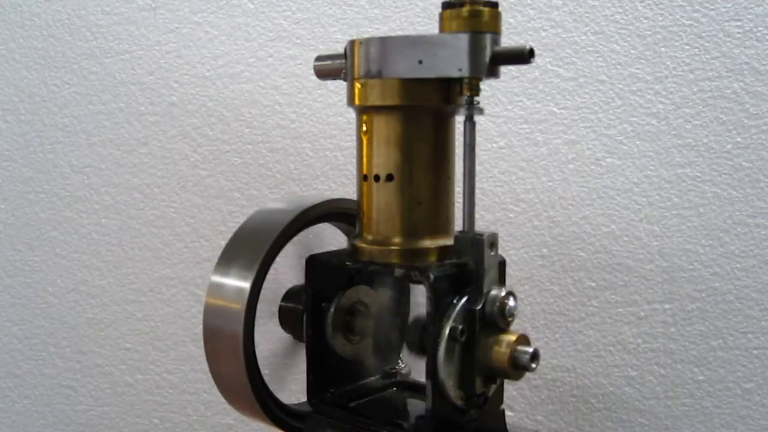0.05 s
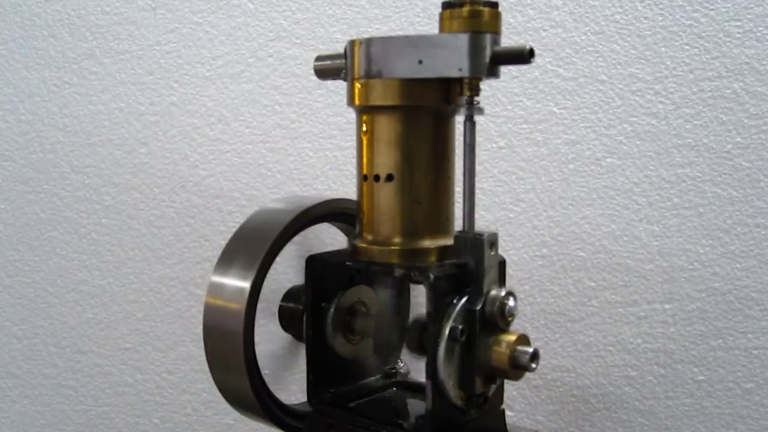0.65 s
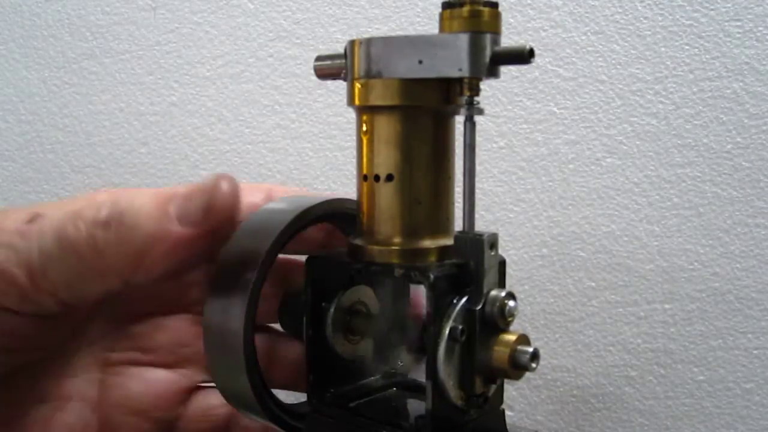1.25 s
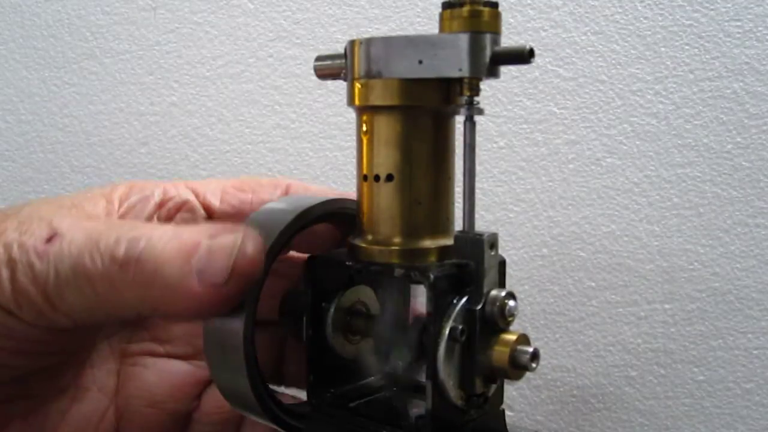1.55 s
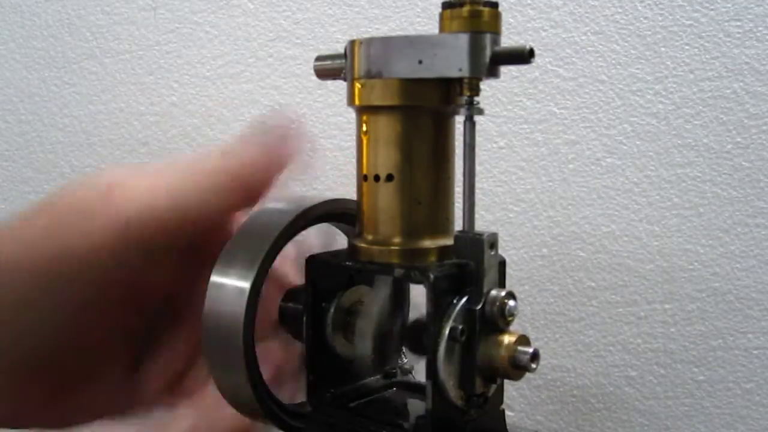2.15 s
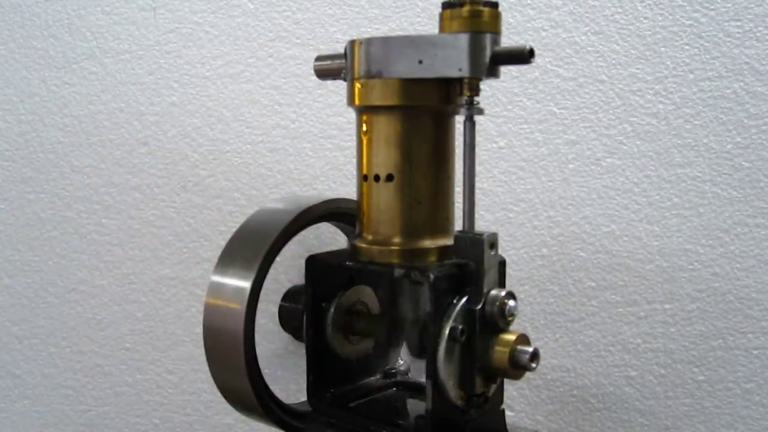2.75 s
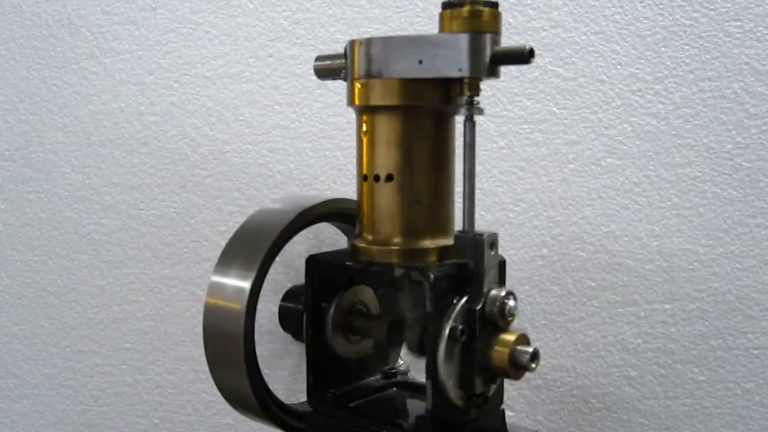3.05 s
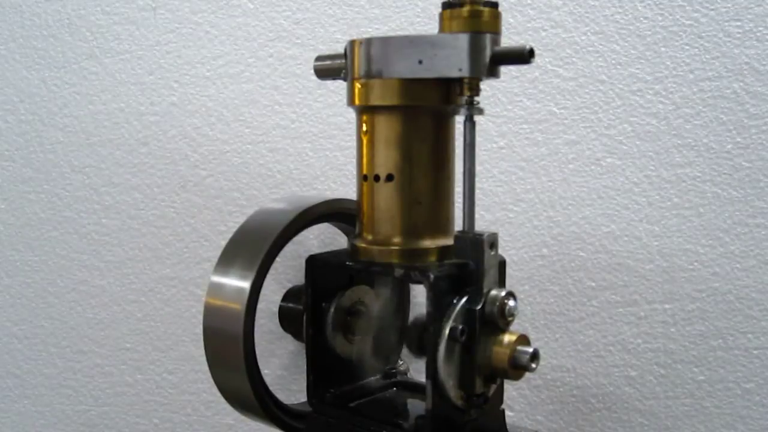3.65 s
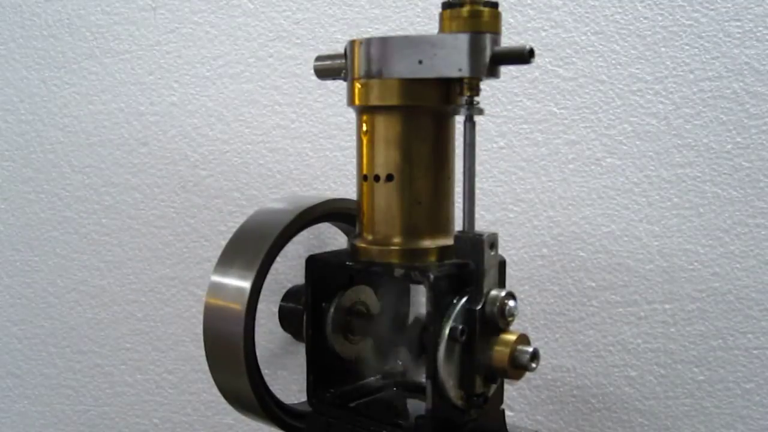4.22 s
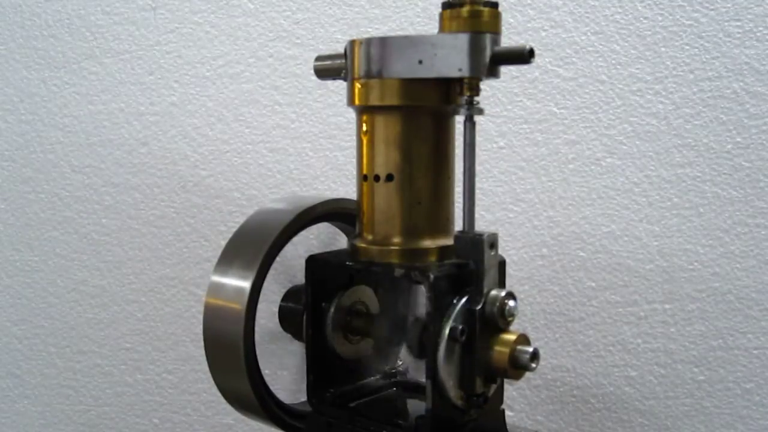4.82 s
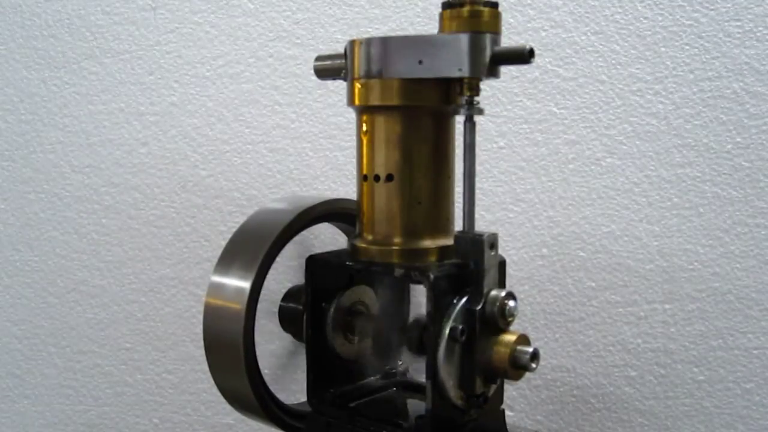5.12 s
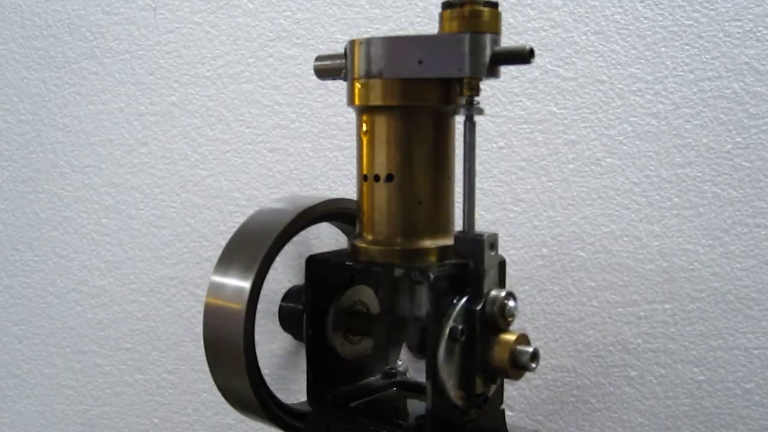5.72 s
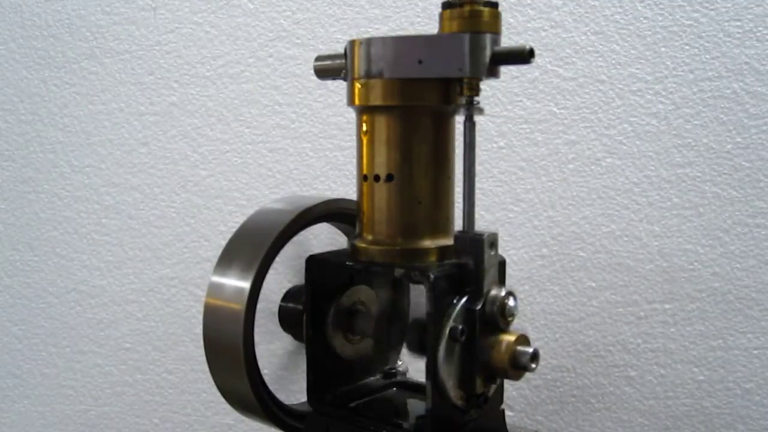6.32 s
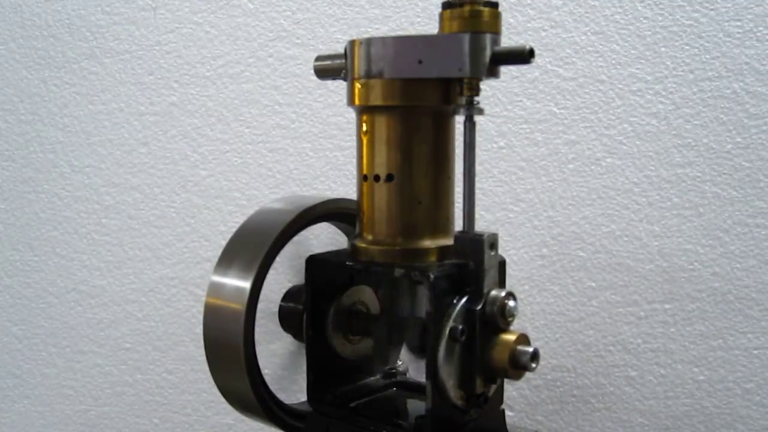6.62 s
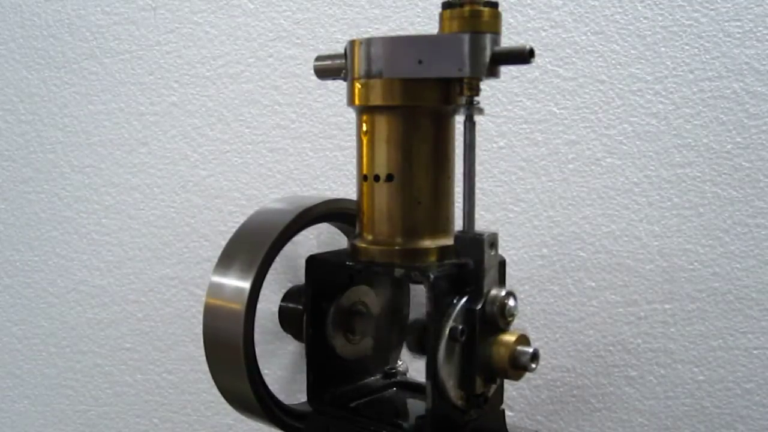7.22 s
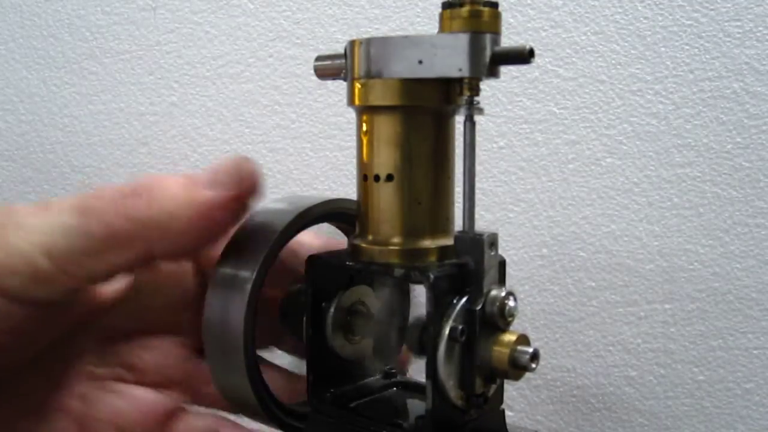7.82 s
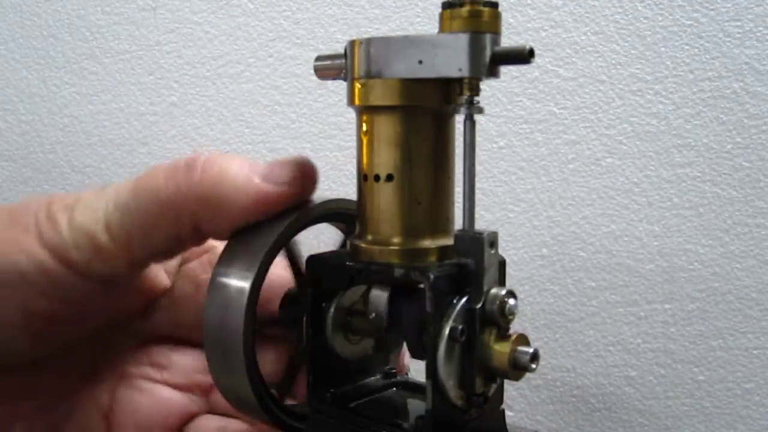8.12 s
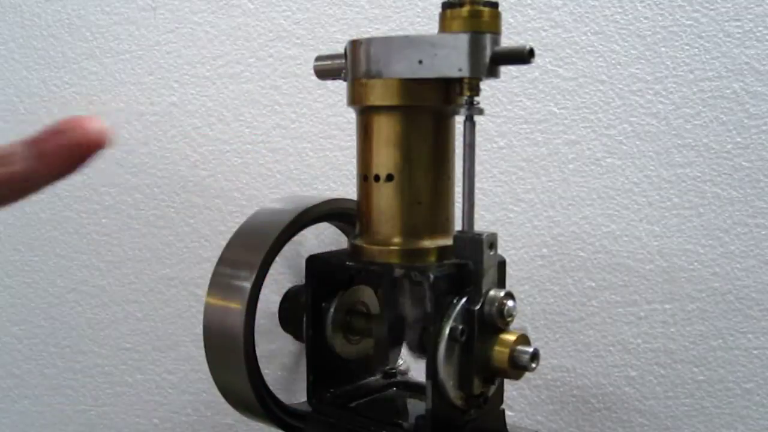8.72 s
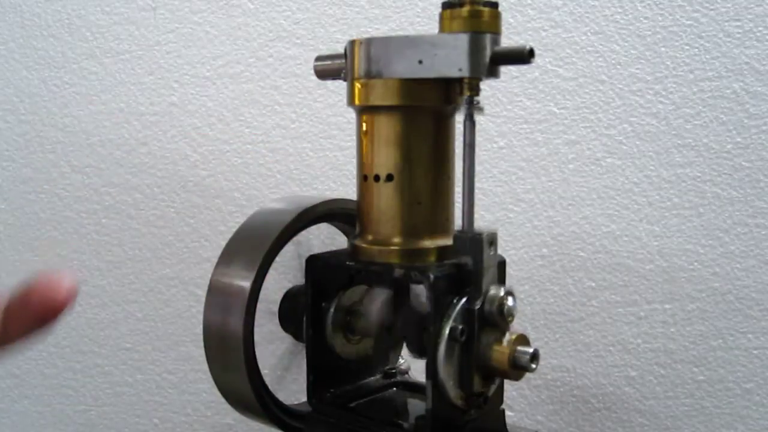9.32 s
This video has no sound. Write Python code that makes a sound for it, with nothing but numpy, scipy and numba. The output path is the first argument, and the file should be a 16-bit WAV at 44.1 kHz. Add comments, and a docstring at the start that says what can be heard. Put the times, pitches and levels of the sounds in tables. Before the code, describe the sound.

Rapid air puffs and metallic valve clicks from a model engine, stalling twice with short hisses and ending in slow, labored chuffs.

```python
"""A single-cylinder model engine on compressed air, close to the microphone, a wall just behind it.
It starts at full speed: each turn a jet spits, the valve gear clacks and ticks, air leaks past the piston.
Near 1.6 s a hand brakes the flywheel to a stall, then flicks it on, and it gathers speed again.
Near 8 s the hand stalls it once more and air hisses out; after a last flick it only limps along."""
import sys
import numpy as np
from scipy import signal
from scipy.fft import rfft, irfft
from scipy.io import wavfile
from numba import njit

SR = 44100
rng = np.random.default_rng(int(sys.argv[2]) if len(sys.argv) > 2 else 0)


def transcribe(signal):
    """Save signal, clipped to [-1, 1], as a 16-bit WAV file at the path in sys.argv[1]."""
    frames = np.atleast_2d(signal).T
    limited = np.clip(frames, -1, 1)
    pcm = np.round(limited * 32767).astype(np.int16)
    wavfile.write(sys.argv[1], SR, pcm)


N = 421578
RUNNING_TURN_S = .056  # one turn at full speed; "slow" is a turn's length divided by this


def undb(db):
    """Decibels to gain."""
    return 10 ** (np.asarray(db) / 20)


def response(colour, size=2048):
    """Minimum-phase impulse response of unit energy: a colour's levels set only its shape."""
    hz, db = np.transpose(colour)
    bins = np.maximum(np.arange(size // 2 + 1) * SR / size, 1)
    gain = undb(np.interp(np.log(bins), np.log(hz), db))
    cepstrum = irfft(np.log(gain))
    cepstrum[1:size // 2] *= 2
    cepstrum[size // 2 + 1:] = 0
    h = irfft(np.exp(rfft(cepstrum)))
    return h / np.linalg.norm(h)


def through(x, h):
    """Sound x after the impulse response h."""
    return signal.fftconvolve(x, h)[:N]


def noise(colour):
    """Coloured noise of rms 1."""
    return through(rng.standard_normal(N), response(colour))


def ring(hz, t60):
    """One decaying mode."""
    t = np.arange(SR // 10) / SR
    return np.sin(2 * np.pi * hz * t) * np.exp(-np.log(1000) * t / t60)


def impulses(times, sizes):
    """Single impulses at the given times."""
    out = np.zeros(N)
    np.add.at(out, np.clip(np.round(times * SR).astype(int), 0, N - 1), sizes)
    return out


def swells(centres, widths, sizes):
    """Bell-shaped openings, one for each centre time."""
    out, span = np.zeros(N), np.arange(-SR // 20, SR // 20)
    for centre, width, size in zip(centres, widths, sizes):
        i = np.clip(int(centre * SR) + span, 0, N - 1)
        out[i] += size * np.exp(-.5 * ((i / SR - centre) / width) ** 2)
    return out


def held(start_s, hold_s, db, rise_db_per_s, fall_db_per_s):
    """Gain that rises to a level, holds it and dies away."""
    t = np.arange(N) / SR
    early, late = np.maximum(start_s - t, 0), np.maximum(t - start_s - hold_s, 0)
    return undb(db - rise_db_per_s * early - fall_db_per_s * late)


def scatter(times, spread_db):
    """A random gain for each event."""
    return undb(spread_db * rng.standard_normal(len(times)))


def chatter(hits, t60):
    """Each impulse becomes a short, dying rattle of about the same energy."""
    fade = np.exp(-np.log(1000) * np.arange(SR // 10) / SR / t60)
    return through(hits, fade / np.linalg.norm(fade)) * rng.standard_normal(N)


@njit
def moving_band(x, hz, width_hz):
    """State-variable band-pass whose centre may move; gain 1 at the centre."""
    y, band, low = np.empty(len(x)), 0., 0.
    for i in range(len(x)):
        g, damping = np.tan(np.pi * hz[i] / SR), width_hz / hz[i]
        v = (band + g * (x[i] - low)) / (1 + g * (g + damping))
        band, low = 2 * v - band, low + 2 * g * v
        y[i] = damping * v
    return y


def half_whistle(hz, width_hz):
    """A breathy pitch: noise band-passed twice, at rms 1."""
    band = moving_band(rng.standard_normal(N), hz, float(width_hz))
    band = moving_band(band, hz, float(width_hz))
    return band / np.std(band)


# spectrum of the room's background: (frequency [Hz], level [dB])
ROOM_COLOUR = [(25, -8), (110, -12), (220, -11.5), (650, 1), (1300, -1), (2500, -19), (3000, -5),
               (5000, -13.5), (16000, -21)]

def room_tone():
    """The steady hush of the room, far below the engine."""
    return undb(-50.5) * noise(ROOM_COLOUR)


def room(x, db, t60):
    """The small room adds a tail, faint at this close distance."""
    t = np.arange(SR // 2) / SR
    tail = rng.standard_normal(len(t)) * np.exp(-np.log(1000) * t / t60) * (t > WALL_ECHO_S)
    return x + undb(db) * through(x, tail / np.linalg.norm(tail))


WALL_ECHO_S = .00135

def wall(x, echo_db):
    """The wall, about 23 cm behind the engine, returns the sound to the microphone without its bass."""
    lag = int(WALL_ECHO_S * SR)
    bright = signal.sosfilt(signal.butter(1, 350, "high", fs=SR, output="sos"), x)
    return x + undb(echo_db) * np.r_[np.zeros(lag), bright[:-lag]]


# grip, flick, grip, flick on the flywheel: (time [s], hold [s], level [dB])
RUBS = [(1.602, .42, -44), (2.048, .11, -38.5), (8.183, .3, -44.5), (8.534, .085, -36)]
# spectrum of skin on the rim: (frequency [Hz], level [dB])
RUB_COLOUR = [(40, -17), (110, -1.5), (300, -9.5), (650, -3), (1200, -3.5), (2400, -3.5), (3300, -11),
              (8000, -68), (16000, -58)]

def fingers():
    """Skin rubs on the rim while the hand grips the wheel, and harder as it flicks it on."""
    grips = [held(s, hold_s, db, rise_db_per_s=150, fall_db_per_s=400) for s, hold_s, db in RUBS]
    return np.max(grips, axis=0) * noise(RUB_COLOUR)


# slack taken up at each flick: (time [s], relative level [dB], treble offset [dB])
KNOCKS = [(2.107, -4.5, -20), (2.12, -7, -16), (2.13, -1, -2), (8.501, -4.5, -16), (8.503, -9, -21),
          (8.538, -11.5, 12), (8.564, -7.5, -16)]
# spectrum of a loose joint's knock: (frequency [Hz], level [dB])
KNOCK_COLOUR = [(150, -47), (600, -6.5), (1000, 5.5), (1500, -5), (2400, 1.5), (3600, -0.5), (5000, -15),
                (16000, -43)]
# spectrum of a bright tick, also in the valve's return and spit: (frequency [Hz], level [dB])
TICK_COLOUR = [(200, -8.5), (800, 9), (1400, -1.5), (2900, -3.5), (5000, 5.5), (7500, 2), (9500, 4.5),
               (11800, -1.5), (13000, -4), (16000, -13)]

def linkage():
    """Loose joints knock when the wheel is turned by hand, and the wheel clinks faintly."""
    times, db, treble_db = np.transpose(KNOCKS)
    hits = impulses(times, undb(db))
    bright_hits = impulses(times, undb(db + treble_db))
    body = undb(6) * through(chatter(hits, t60=.012), response(KNOCK_COLOUR))
    edge = through(chatter(bright_hits, t60=.012), response(TICK_COLOUR))
    clink = undb(-25) * through(hits, ring(hz=1015, t60=.098))
    return body + edge + clink


# spectrum of air slipping past the piston: (frequency [Hz], level [dB])
LEAK_COLOUR = [(60, -50), (300, -7.5), (460, -15), (950, -4), (1500, -8.5), (2200, -1), (3000, -4),
               (4200, -4), (5500, -5), (7200, -4), (9000, -14), (12000, -22), (16000, -31)]

def piston_leak(times, turn_s):
    """Hiss past the piston swells with each turn's pressure, grows on slow turns and fades in a stall."""
    t = np.arange(N) / SR
    turn = np.maximum(np.searchsorted(times, t) - 1, 0)
    doublings = np.log2(turn_s / RUNNING_TURN_S)
    slowness = np.interp(t, times, doublings)
    stalled_s = np.maximum(t - times[turn] - turn_s[turn], 0)
    db_per_doubling, fade_db_per_s = 5.5, 50
    leak_db = -35.5 + db_per_doubling * slowness - fade_db_per_s * stalled_s
    turns_done = np.interp(t, times, np.arange(len(times)))
    pressure_db = 3 * np.cos(2 * np.pi * (turns_done - .8))  # peaks 0.8 turn after a clack
    # the gap on either side of the piston resettles at each clack and keeps its pitch for the turn;
    # on slow turns it whistles a little higher and less settled
    wander = .17 * rng.standard_normal((len(times), 2)).T
    octaves = np.clip(doublings * (.093 + wander), -1, 1)
    whistle = sum(half_whistle(4490 * 2 ** side[turn], width_hz=650) for side in octaves)
    hiss = undb(-2) * noise(LEAK_COLOUR)
    return undb(leak_db + pressure_db) * (hiss + undb(-9.5 + slowness) * whistle)


# one squeeze of air at each stall: (time [s], level [dB], whistle pitch [Hz], whistle offset [dB])
SQUEEZES = [(1.75, -24.5, 4140, -5.5), (8.255, -24.5, 5260, -5)]

def squeezed_air():
    """As the braked piston creeps to a stop, trapped air swells out past it, half whistling."""
    t, out = np.arange(N) / SR, np.zeros(N)
    slope_db_per_s, rounding_s = 128, .0079
    for peak_s, db, hz, whistle_db in SQUEEZES:
        away_s = np.hypot(t - peak_s, rounding_s) - rounding_s
        whistle = undb(whistle_db) * half_whistle(np.full(N, float(hz)), width_hz=820)
        hiss = undb(-2.5) * noise(LEAK_COLOUR)
        out += undb(db - slope_db_per_s * away_s) * (hiss + whistle)
    return out


# spectrum of air escaping at the stalled valve: (frequency [Hz], level [dB])
HISS_COLOUR = [(300, -61), (900, -22), (2300, -2.5), (3200, -4.5), (5400, 0.5), (6800, -16), (9600, -15),
               (10700, 2), (11500, -4), (12600, -18), (16000, -17)]

def valve_hiss():
    """The stalled valve cracks open with a spurt, blows steadily and closes to a trickle."""
    opening = dict(start_s=8.371, rise_db_per_s=7000)
    spurt = held(**opening, hold_s=0, db=-14, fall_db_per_s=400)
    blow = held(**opening, hold_s=.091, db=-23, fall_db_per_s=650)
    trickle = held(**opening, hold_s=.19, db=-37, fall_db_per_s=500)
    return np.max([spurt, blow, trickle], axis=0) * noise(HISS_COLOUR)


def clack_times(run):
    """The valve clacks as a run starts and whenever the flywheel completes a turn."""
    run_s, speed = np.transpose(run)
    t = np.arange(run_s[0], run_s[-1], 1 / SR)
    turns = np.cumsum(np.interp(t, run_s, speed)) / SR
    return np.interp(np.arange(int(turns[-1]) + 1), turns, t)


# the flywheel runs steadily and is braked: (time [s], speed [turns/s])
STEADY_RUN = [(0.0164, 18.2772), (0.4407, 18.3975), (1.0477, 17.778), (1.4364, 17.8097), (1.6136, 10.1995)]
# flicked on, it gathers speed, levels off and is braked: (time [s], speed [turns/s])
SPIN_UP_RUN = [(2.1799, 8.6422), (2.35, 10.5317), (2.8, 12.6699), (3.54, 14.7149), (4.78, 16.9639),
               (5.15, 17.7789), (6.49, 17.7799), (6.81, 17.5815), (7.34, 18.0292), (7.93, 18.1466),
               (7.99, 16.491), (8.16, 0.0)]
# flicked on again, it limps and runs down: (time [s], speed [turns/s])
LIMPING_RUN = [(8.6139, 7.7088), (8.8155, 7.7879), (9.1783, 7.1271), (9.265, 5.8234), (9.4932, 5.1175)]

def flywheel():
    """The wheel paces the engine: the time of every clack and the length of the shorter turn beside it."""
    times = np.concatenate([clack_times(run) for run in (STEADY_RUN, SPIN_UP_RUN, LIMPING_RUN)])
    gaps = np.diff(times)
    return times, np.minimum(np.r_[gaps[0], gaps], np.r_[gaps, gaps[-1]])


def valve_return(times, turn_s):
    """The push rod drops back about a quarter turn after the clack: two light ticks and a ringing tap."""
    slow = turn_s / RUNNING_TURN_S
    jitter_s = .0005 * rng.standard_normal(len(times))
    seat_s = times + .275 * turn_s * slow ** .12 + jitter_s
    seating = impulses(seat_s, scatter(times, spread_db=5) * slow ** .78)
    early = undb(-1.5) * impulses(seat_s - .0055, scatter(times, spread_db=6) * slow ** .61)
    taps = impulses(seat_s - .003, scatter(times, spread_db=1) * slow ** .9)
    ticks = undb(-12.5) * through(chatter(early + seating, t60=.016), response(TICK_COLOUR))
    rod = undb(-36) * ring(hz=750, t60=.03) + undb(-33) * ring(hz=2850, t60=.025)
    return ticks + through(taps, rod)


# spectrum of the exhaust jet, close up: (frequency [Hz], level [dB])
JET_COLOUR = [(60, -49), (450, -12.5), (800, -5.5), (1250, -16.5), (1750, -16), (2120, 4.5), (2600, -19),
              (3200, -8.5), (4600, -8), (7000, -10.5), (9700, -20), (11500, -7), (13000, -13.5),
              (16000, -14.5)]
# spectrum of a strong jet's shrill edge: (frequency [Hz], level [dB])
SHRILL_COLOUR = [(300, 3.5), (5000, -3.5), (9700, -8), (10800, 3), (11500, 11.5), (12600, -9), (16000, -44)]

def exhaust(times, turn_s):
    """A jet spits just before each clack; slow turns fill the cylinder more: a longer, shriller jet."""
    slow = turn_s / RUNNING_TURN_S
    size = slow ** .27 * scatter(times, spread_db=1)
    lead_s, width_s = .0014 * slow ** .7, .00105 * slow ** .4
    jet = undb(-14.5) * swells(times - lead_s, width_s, size) * noise(JET_COLOUR)
    # a thin spit as the valve cracks open
    crack = swells(times - .0046, np.full(len(times), .0005), size)
    spit = undb(-28) * crack * noise(TICK_COLOUR)
    edge = swells(times - .95 * lead_s, .93 * width_s, np.clip(slow - 1.2, 0, 1))
    shrill = undb(-13.5) * edge * noise(SHRILL_COLOUR)
    # the open port whistles briefly after the slow puffs
    still_open = swells(times + .11 * turn_s, .095 * turn_s, np.clip(slow - 1.4, 0, .7))
    port_colour = [(1200, -47), (1950, -11), (2250, 1), (2650, -7), (4000, -26)]
    whistle = undb(-24.5) * still_open * noise(port_colour)
    return jet + spit + shrill + whistle


# spectrum of the valve gear's hard strike, close up: (frequency [Hz], level [dB])
CLACK_COLOUR = [(100, -36), (500, -22), (1500, -22), (2250, -9), (3100, -12), (3800, -1), (4500, 0),
                (5300, -3), (6100, -4.5), (7200, -4.5), (8200, -16), (9500, -18), (11000, -27),
                (14000, -18), (16000, -24)]
# spectrum of parts buzzing against each other: (frequency [Hz], level [dB])
BUZZ_COLOUR = [(200, -29), (900, -20), (2250, 1), (3000, -1.5), (3800, 0.5), (4600, 1), (5300, 2),
               (6500, -4), (8200, -6), (11000, -17.5), (16000, -10)]
# modes of the frame and cylinder: (frequency [Hz], level [dB], t60 [s])
FRAME_MODES = [(312, -55, 0.082), (1725, -32.5, 0.063), (2450, -15, 0.012), (3860, -49, 0.053),
               (4670, -29, 0.0099), (5160, -59, 0.028), (6360, -42, 0.059)]
# spectrum of the valve lifting: (frequency [Hz], level [dB])
THUMP_COLOUR = [(30, -35), (90, -22), (160, -14), (272, -6.5), (400, -8.5), (520, 1), (700, -0.5),
                (1000, 0.5), (1250, -2.5), (2000, -44), (8000, -22)]
# spectrum of the port popping open: (frequency [Hz], level [dB])
POP_COLOUR = [(30, -43), (120, -16), (260, 3), (450, 0.5), (750, 4), (1100, 3.5), (2000, -20.5),
              (8000, -20)]

def valve_clack(times, turn_s):
    """A dull thump as the valve lifts, then a hard clack that rings the frame and shakes the parts."""
    slow = turn_s / RUNNING_TURN_S
    hits = impulses(times - .0001, slow ** .24 * scatter(times, spread_db=.5))
    clack = undb(12) * through(hits, response(CLACK_COLOUR))
    shaken = impulses(times + .0006, slow)
    buzz = undb(5.5) * through(chatter(shaken, t60=.012), response(BUZZ_COLOUR))
    frame = through(hits, sum(undb(db) * ring(hz, t60) for hz, db, t60 in FRAME_MODES))
    lifts = impulses(times - .00095, slow ** .4 * scatter(times, spread_db=.3))
    thump = undb(3) * through(lifts, response(THUMP_COLOUR))
    # on slow turns the port pops open ahead of the jet
    openings = impulses(times - .00318 * slow ** .5, np.clip(slow - 1, 0, 1.2))
    pop = undb(-1) * through(openings, response(POP_COLOUR))
    return clack + buzz + frame + thump + pop


def scene():
    """One close microphone on the engine, its air and the hand, in front of a small room's wall."""
    times, turn_s = flywheel()
    metal = valve_clack(times, turn_s) + valve_return(times, turn_s) + linkage()
    air = exhaust(times, turn_s) + piston_leak(times, turn_s) + squeezed_air() + valve_hiss()
    close = wall(metal, echo_db=-10) + air + fingers()
    return (room(close, db=-19.5, t60=.48) + room_tone())[None]


def record(dry):
    """The recorder rounds off the loudest peaks and cuts the top."""
    ceiling, top_hz = .7, 15800
    oversampled = signal.resample_poly(dry, 2, 1, axis=1)
    rounded = oversampled / (1 + (oversampled / ceiling) ** 4) ** (1 / 4)
    limited = signal.resample_poly(rounded, 1, 2, axis=1)
    return signal.fftconvolve(limited, signal.firwin(255, top_hz, fs=SR)[None], "same")


dry = scene()
out = record(dry)
transcribe(out)
```